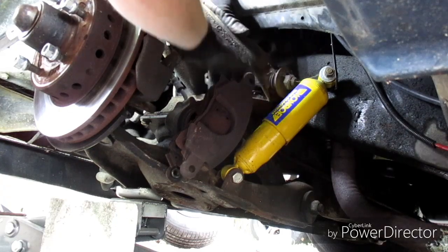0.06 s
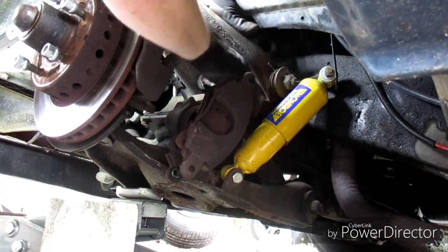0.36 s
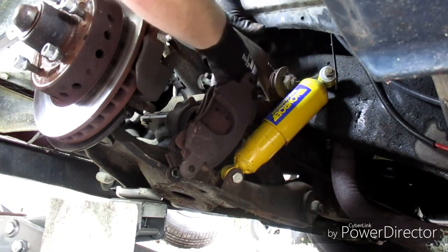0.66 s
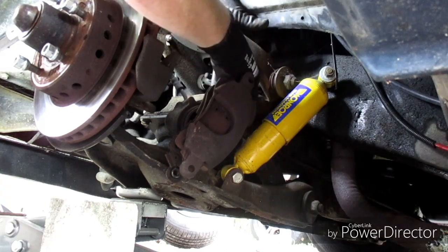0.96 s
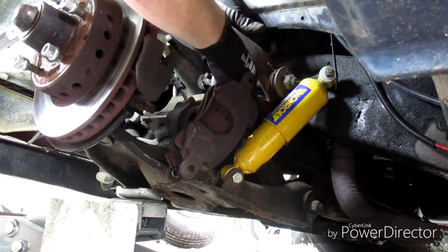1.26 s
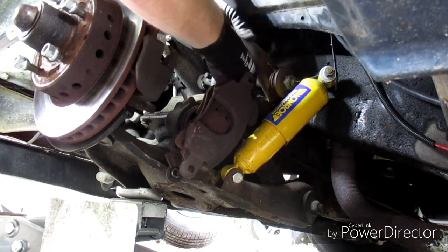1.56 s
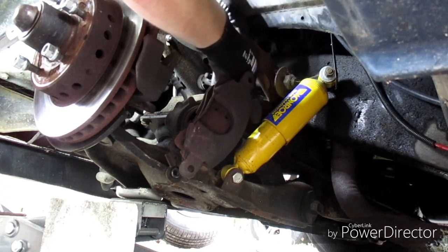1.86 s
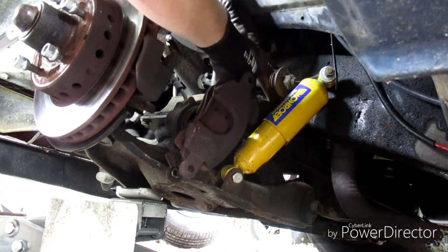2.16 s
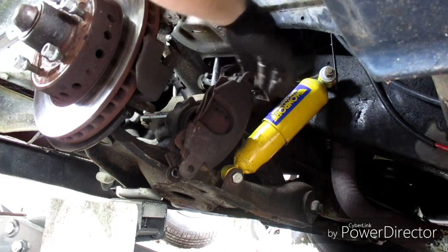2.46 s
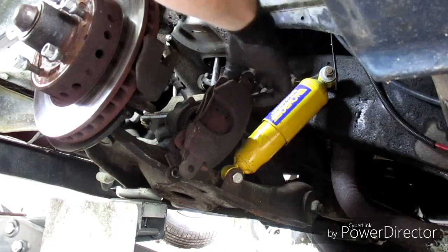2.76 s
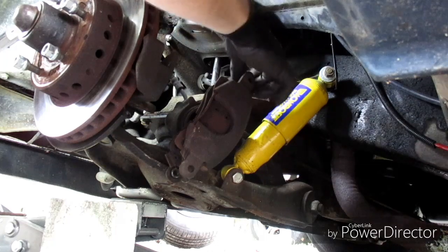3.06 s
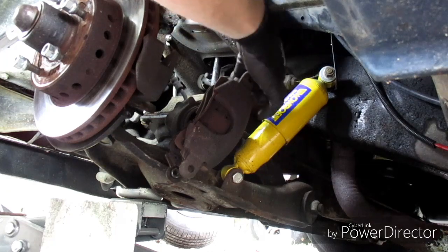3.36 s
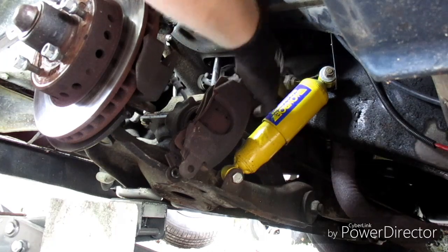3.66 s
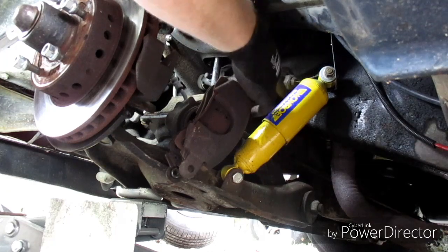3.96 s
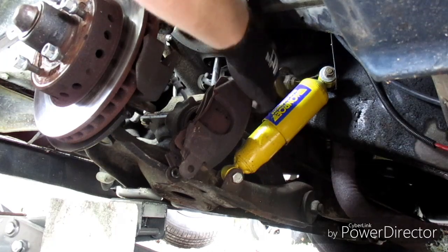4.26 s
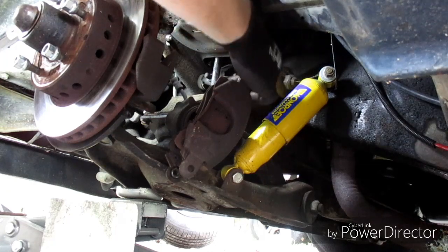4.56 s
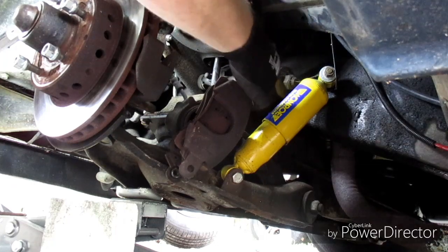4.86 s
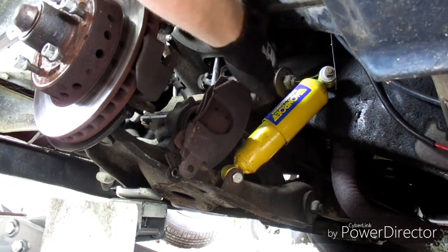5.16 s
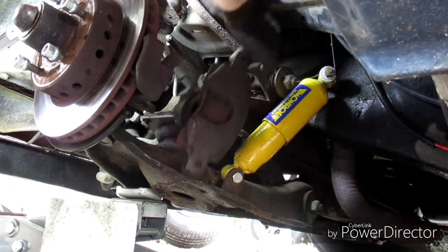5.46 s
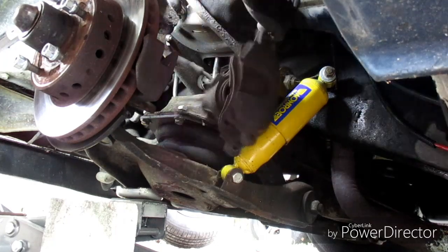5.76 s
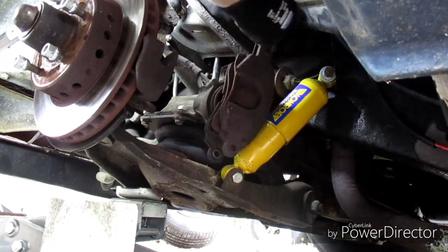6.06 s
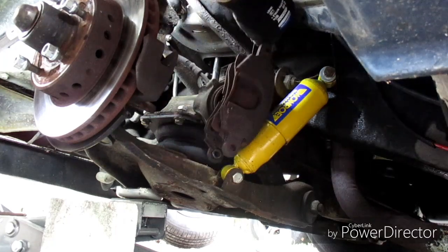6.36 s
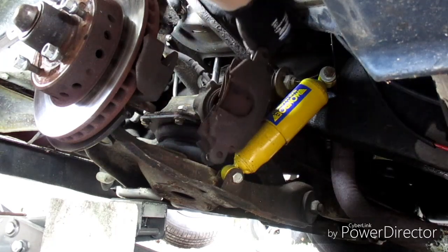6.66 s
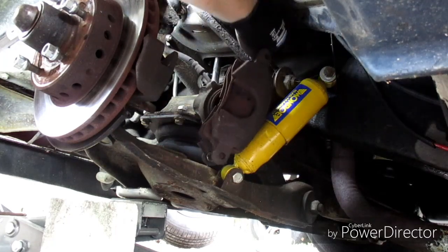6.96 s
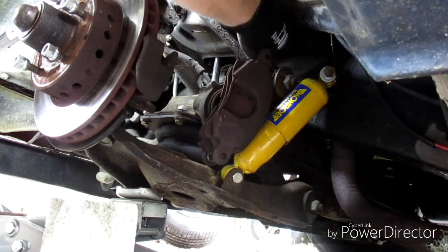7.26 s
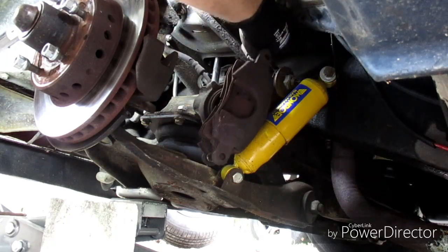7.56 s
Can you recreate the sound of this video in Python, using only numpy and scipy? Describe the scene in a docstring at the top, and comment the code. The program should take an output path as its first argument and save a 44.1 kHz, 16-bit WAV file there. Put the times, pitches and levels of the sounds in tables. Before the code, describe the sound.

A low engine hum from the street slowly falls in pitch and fades over a steady outdoor wash. Close by, under a truck in an open garage, small steel parts tick and scrape faintly, and a clip snaps once. The brake caliper then grinds loose with dull knocks, hits the suspension with one loud, sharp clank and rattles briefly to rest. A few light taps follow.

```python
"""Under a truck in an open garage, a gloved hand works a brake caliper loose. Small steel parts tick and snap,
soft hisses with narrow resonances swell and fade, and a brief gritty scrape sounds; then the heavy caliper
shifts, drops against the suspension with a clank and rattles to rest, each impact exciting damped modes.
Outside, the firing harmonics of a V8 fall and fade as it slows, over the wash of the street. Faint, high
whistles sound near the end."""
import sys
import numpy as np
from scipy import signal
from scipy.fft import rfft, irfft, next_fast_len
from scipy.io import wavfile
from scipy.ndimage import uniform_filter1d

SR = 44100
rng = np.random.default_rng(int(sys.argv[2]) if len(sys.argv) > 2 else 0)


def put_to_file(sound):
    """Save the sound as 16-bit audio at rate SR, in the file named by the first command-line argument."""
    columns = np.atleast_2d(sound).T  # one column per channel
    safe = np.clip(columns, -1, 1)
    whole_steps = np.round(safe * 32767)
    wavfile.write(sys.argv[1], SR, whole_steps.astype(np.int16))


N = 336171
TIME = np.arange(N) / SR

# Spectrum of steel striking steel. Each row: frequency in Hz, relative level in dB.
STEEL_SPECTRUM = [(200, -7), (800, 7), (1400, 23.5), (2050, 11.5), (3300, 7.5), (4200, 5.5), (5500, 1),
                  (7000, 1.5), (9700, -2), (11500, -11), (15500, -20)]


def amp(db):
    """Converts decibels to an amplitude ratio."""
    return 10 ** (np.asarray(db) / 20)


def unit_rms(x):
    """Normalises a signal to rms 1."""
    return x / np.sqrt(np.mean(x ** 2) + 1e-20)


def level_at(spectrum, hz):
    """Interpolates a spectrum's level in dB along a logarithmic frequency axis."""
    f, db = np.transpose(spectrum)
    return np.interp(np.log(hz + 1), np.log(f), db)


def curve(points):
    """Interpolates (seconds, value) points linearly to every sample."""
    return np.interp(TIME, *np.transpose(points))


def noise(spectrum, size=N):
    """White noise filtered to a given spectrum, at rms 1."""
    fast = next_fast_len(size)
    gain = amp(level_at(spectrum, np.fft.rfftfreq(fast, 1 / SR)))
    return unit_rms(irfft(rfft(rng.standard_normal(fast)) * gain, fast)[:size])


def drift(per_s):
    """A random fluctuation of rms 1 that takes per_s new values a second."""
    knots = rng.standard_normal(size=8000)
    return unit_rms(np.interp(TIME * per_s, np.arange(len(knots)), knots))


def add(mix, start_s, sound):
    """Superposes a sound on the mix."""
    part = mix[round(start_s * SR):][:len(sound)]
    part += sound[:len(part)]


def impacts(rows, modes, spectrum, focus_db, ring_focus_db, t60, rise_s,
            hard_db=np.inf, shorten=1, loose=False):
    """Modal response: each blow excites a noise-like clatter of dense modes and a few distinct ones."""
    out, t = np.zeros(N), np.arange(SR // 2) / SR
    hardening_span_db, choke_s = 15, .003
    mode_hz, mode_db, mode_t60 = np.transpose(modes)[:, :, None]
    next_contact = [row[0] for row in rows[1:]] + [np.inf]
    for (start_s, strength_db, hz, ring_db), next_s in zip(rows, next_contact):
        # a blow as strong as hard_db rebounds cleanly: it is briefer and excites every mode
        hard = np.clip(1 + (strength_db - hard_db) / hardening_span_db, 0, 1)
        time_scale = shorten ** hard
        # the contact colours the clatter: focus_db is the loss one octave from its pitch
        tinted = [(f, db - focus_db * np.log2(f / hz) ** 2) for f, db in spectrum]
        clatter = noise(tinted, size=len(t)) * amp(-60 * t / (t60 * time_scale))
        # a lighter blow favours the modes near its pitch
        off_pitch_db = ring_focus_db * (1 - hard) * np.log2(mode_hz / hz) ** 2
        start_db = ring_db + mode_db - off_pitch_db - 5.5 * hard  # a clean strike rings less
        start_db += 0.26 * rng.standard_normal(mode_hz.shape)
        ring = amp(start_db - 60 * t / mode_t60) * np.sin(2 * np.pi * mode_hz * t)
        if loose:  # the part chatters on its seat; after a rebound, the next contact damps it
            ring *= amp(1.25 * (1 - hard) * drift(per_s=280)[:len(t)])
            ring *= np.exp(-hard * np.maximum(t - (next_s - start_s), 0) / choke_s)
        attack = np.minimum(t / (rise_s * time_scale), 1)
        add(out, start_s, amp(strength_db) * (clatter + ring.sum(0)) * attack)
    return out


def caliper():
    """Impact excitation: the caliper's modes ring as it grinds loose, strikes steel and bounces."""
    # Each row: mode frequency in Hz, level in dB, 60 dB decay time in seconds.
    modes = [(1240, -13, .03), (1548, -11, .075), (1669, -16, .07), (2240, -12, .04), (2643, 0, .078),
             (2912, -25, .15), (3170, -27, .05), (4072, -22, .075), (4270, -23, .065), (4800, -6, .012),
             (4992, -2, .027), (5650, -10, .028), (6250, 2, .011), (6720, 0, .013), (7320, -3, .023),
             (7850, -8, .015), (8489, -19, .04), (9787, -9, .025)]
    # Steel-on-steel contacts. Each row: start in seconds, strength in dB, pitch in Hz, ring gain in dB.
    grinds = [(5.496, -28, 1720, 24)]
    clanks = [(5.449, -32.5, 1548, 8), (5.4645, -39, 1630, 16), (5.502, -29.5, 4120, 25.5),
              (5.516, -35, 4000, 14), (5.541, -31, 4140, 14), (5.569, -36, 5560, 5), (5.576, -39, 3200, 29),
              (5.7815, -20.5, 5600, 18), (5.795, -24.5, 4080, 22), (5.8122, 1.5, 6340, 3),
              (5.848, -21.5, 4040, 20), (5.852, -27.5, 2990, 23), (5.888, -35, 4100, 10),
              (5.899, -24, 4100, 9), (5.9455, -37, 6720, 2), (5.9895, -34, 1800, -8),
              (6.0355, -39, 2300, -2.5), (6.072, -37, 3380, -7.5), (6.477, -37, 4300, -2),
              (6.495, -31.5, 4100, 9), (6.497, -37, 2680, -2)]
    grind = impacts(grinds, modes, STEEL_SPECTRUM, focus_db=0.5, ring_focus_db=500,
                    t60=0.15, rise_s=0.0057)
    rattle = impacts(clanks, modes, STEEL_SPECTRUM, focus_db=1.8, ring_focus_db=1100,
                     t60=0.067, rise_s=0.0016, hard_db=0, shorten=0.27, loose=True)
    return grind + rattle


def suspension():
    """Damped vibration: the heavy arm's low modes answer the caliper's slow drag and dull knocks."""
    # Each row: mode frequency in Hz, level in dB, 60 dB decay time in seconds.
    modes = [(92, -7, 0.3), (140, -0.5, 0.16), (218.6, 3.5, 0.1), (244.6, -7, 0.28), (317, -12.5, 0.43),
             (357, -17, 0.6), (393, -10, 0.33), (429, -30, .12), (604, -2.5, 0.097), (767, -8, 0.17),
             (880, -9, 0.057), (1100, -8, 0.22)]
    # Spectrum of a dull blow. Each row: frequency in Hz, relative level in dB.
    thud = [(30, -7), (70, 17.5), (200, 5.5), (420, 2), (600, -8), (950, -7), (1300, -16.5), (2500, -23.5),
            (6000, -29), (12000, -46)]
    # Each row: start in seconds, strength in dB, pitch in Hz, ring gain in dB.
    drags = [(5.385, -22, 557, -24)]
    knocks = [(5.4965, -17.5, 388, 0), (5.506, -25, 330, -4), (5.519, -15, 150, 1),
              (5.531, -20.5, 378, -12), (5.569, -29.5, 338, 7.5), (5.7815, -6, 520, -1.5),
              (5.803, -13, 220, 12.5), (5.898, -8, 447, 5.5), (5.903, -19.5, 860, -5),
              (6.478, -43, 200, 13), (6.495, -29.5, 950, -18)]
    drag = impacts(drags, modes, thud, focus_db=2, ring_focus_db=0, t60=.7, rise_s=.05)
    return drag + impacts(knocks, modes, thud, focus_db=2, ring_focus_db=15.5, t60=0.24, rise_s=0.0032)


def small_parts():
    """Brief contacts excite high modes: a tap on the bracket, ticks and one snap of the spring clip."""
    # Each row: mode frequency in Hz, level in dB, 60 dB decay time in seconds.
    bracket_modes = [(1620, 2, 0.041), (1760, -6, 0.049), (2700, -8, 0.056), (5642, -13, .05),
                     (7289, -17, .04)]
    clip_modes = [(1400, -6, .025), (2450, -4, .03), (2860, -6, .045), (3300, -7, .03), (3811, -7, .05),
                  (4250, -5, .025), (4985, 3, .035), (5640, -5, .04), (6700, -5, .03), (7305, -10, .07),
                  (7800, -3, .03), (8400, -7, .06), (8880, -3, .045), (9825, -8, .06), (10870, -6, .05)]
    # Each row: frequency in Hz, relative level in dB.
    tick_spectrum = [(300, -22), (1000, -10), (1700, 0), (3000, 2), (5500, 1), (9000, 3.5), (12000, -6),
                     (15500, -12)]
    # Each row: start in seconds, strength in dB, pitch in Hz, ring gain in dB.
    taps = [(3.2995, -31.5, 2000, 2.2)]
    ticks = [(.2618, -40, 5840, 7), (.3237, -43, 8600, 1), (.501, -47, 7900, 1), (.9802, -48, 9000, -7),
             (2.8654, -43.5, 7000, -6), (2.973, -44.5, 8000, 2), (3.0739, -42.5, 8500, -1),
             (3.1877, -48, 9000, -10), (3.4239, -17, 6900, -1.5), (3.5443, -39, 6060, 8.5),
             (3.555, -40, 6900, -7), (4.133, -50.5, 5000, 1), (4.7112, -47, 9000, -4),
             (5.192, -50, 4500, 8)]
    bracket = impacts(taps, bracket_modes, STEEL_SPECTRUM, focus_db=1, ring_focus_db=0.5,
                      t60=0.045, rise_s=0.00082)
    clip = impacts(ticks, clip_modes, tick_spectrum, focus_db=-1, ring_focus_db=254,
                   t60=0.047, rise_s=.001, hard_db=-19, shorten=0.73)
    return bracket + clip


def resonant_strokes(slips_per_s=1400, grit_db=-3, judder_db=1.5):
    """Sparse, uneven clicks drive narrow resonances over grit: soft hisses swell and fade, a gritty scrape
    leads into the clank, and a thin ring follows."""
    # Each row: start, rise, hold and fall in seconds, level in dB, squeak tilt in dB per octave,
    # squeak gain in dB.
    strokes = [(2.88, 0.18, 0.53, 0.17, -53, -2.5, -0.5), (4.05, .12, .37, .1, -55.5, -7, -1.5),
               (4.81, 0.013, 0.073, .2, -51.5, -10, -0.5), (5.39, 0.046, .04, .03, -43.5, -3, -13),
               (5.582, 0.09, 0.072, .04, -50.5, -3, -4), (6.064, .005, 0.04, .2, -59, -28, 6)]
    # Each row: centre frequency in Hz, bandwidth in Hz, level in dB.
    resonances = [(2430, 70, -0.5), (3240, 100, -4), (4780, 140, -8), (7150, 120, -10)]
    # Each row: frequency in Hz, relative level in dB.
    grit_spectrum = [(1000, -24), (2400, 2), (5000, -5), (9000, -17), (15500, -30)]
    out = np.zeros(N)
    slips = rng.standard_normal(N) * (rng.random(N) < slips_per_s / SR)
    rings = [unit_rms(signal.lfilter(*signal.iirpeak(hz, hz / width, SR), slips))
             for hz, width, _ in resonances]
    grit = amp(grit_db) * noise(grit_spectrum)
    judder = amp(judder_db * drift(per_s=60))
    for start_s, rise, hold, fall, db, tilt, squeak_db in strokes:
        pressure = np.interp(TIME, start_s + np.cumsum([0, rise, hold, fall]), [0, 1, 1, 0])
        squeak = sum(ring * amp(ring_db + tilt * np.log2(hz / resonances[0][0]))
                     for ring, (hz, _, ring_db) in zip(rings, resonances))
        out += amp(db) * pressure * judder * (amp(squeak_db) * squeak + grit)
    return out


def underbody(x, wet_db=-21, t60=.13):
    """Early reflections between the floor and the wheel well follow the direct sound and die quickly."""
    t = np.arange(SR // 3) / SR
    echoes = rng.standard_normal(len(t)) * (rng.random(len(t)) < 2000 / SR)
    response = echoes * (t > .003) * amp(-60 * t / t60)
    return x + amp(wet_db) * signal.fftconvolve(x, response / np.linalg.norm(response))[:N]


def engine(cruise_hz=19, waver_db=1.6, jitter_rad=0.12, throb_depth=0.098):
    """Periodic excitation: uneven firings give harmonics of the cycle rate, over rumble and roar."""
    # Each row: time in seconds, four-stroke cycles per second.
    speed_points = [(0, 25.4), (.14, 25.1), (.24, 23.8), (.35, 21.1), (.47, 18.9), (.88, 18.95), (1, 19.2),
                    (1.39, 19.6), (1.6, 19.25), (2.5, 18.65), (3, 17.6), (3.25, 16.1), (3.5, 15),
                    (3.95, 13.4), (5, 12.6), (6, 11), (7.1, 9.1)]
    # Each row: time in seconds, throttle from 0 (coasting) to 1 (pulling).
    throttle_points = [(0, 0.71), (1, 1), (2.2, 0), (3.1, 0), (3.9, 1), (7.62, 1)]
    # Each row: time in seconds, gain of the exhaust hum in dB.
    hum_points = [(0, -18.5), (.13, -16.5), (.23, -16), (.38, -22), (.8, -21.5), (1.1, -22.5),
                  (1.27, -24.5), (1.42, -22.5), (1.62, -24.5), (1.96, -24.5), (2.08, -25.5), (2.5, -25),
                  (2.95, -26), (3.5, -34), (4.3, -31), (4.65, -33.5), (5, -31), (6.2, -29.5), (6.8, -39),
                  (7.62, -38)]
    # Exhaust harmonics. Each row: multiple of the cycle rate, relative dB pulling, relative dB coasting.
    orders = [(3, -10, -7.5), (4, -31, -21), (5, -2, -3), (6, -6.5, -5.5), (7, -22, -10), (8, 0.5, -1),
              (9, -8, -6.5), (10, -13.5, -13.5), (11, -9.5, -2), (12, -17, -8), (13, -7.5, -13),
              (14, -11, -17), (15, -11, -12), (16, -12, -9.5), (17, -15.5, -13), (18, -13, -10)]
    # Each row: frequency in Hz, relative level in dB.
    exhaust_response = [(25, -12), (50, -1.5), (72, 2.5), (100, 1.5), (122, 3), (138, -2.5), (155, 1.5),
                        (185, -2.5), (225, -4), (247, 3), (275, -9.5), (300, -11), (327, -1), (360, -8.5),
                        (500, -10.5)]
    rumble_spectrum = [(20, -24), (35, -10), (60, -9), (110, 0), (180, 0.5), (260, -6.5), (400, -12.5),
                       (700, -19.5), (2000, -77)]
    roar_spectrum = [(150, -28), (300, -6), (400, -9.5), (560, -9), (680, -10), (860, -6), (1300, -15),
                     (2400, -20), (3700, -28.5), (6400, -35.5), (11000, -46), (15500, -62)]
    cycle_hz, throttle = curve(speed_points), curve(throttle_points)
    cycle_phase = 2 * np.pi * np.cumsum(cycle_hz) / SR
    harmonics = np.zeros(N)
    for order, pull_db, coast_db in orders:
        db = coast_db + throttle * (pull_db - coast_db) + level_at(exhaust_response, order * cycle_hz)
        # each order wavers on its own as the echoes off the street shift
        db += waver_db * drift(per_s=9.2)
        phase = order * cycle_phase + jitter_rad * drift(per_s=8) + 2 * np.pi * rng.random()
        harmonics += amp(db) * np.cos(phase)
    hum = amp(-0.44) * unit_rms(harmonics) + amp(-9.5) * noise(rumble_spectrum)
    throb = 1 + throb_depth * np.cos(8 * cycle_phase)  # eight firings make one cycle
    roar = noise(roar_spectrum) * throb * amp(0.13 * drift(per_s=30))
    roar_db = -38.5 + 9 * np.log2(cycle_hz / cruise_hz)  # 9 dB for each doubling of speed
    roar_db += 2 * np.exp(-((TIME - 1.54) / 0.42) ** 2)  # one swell while cruising
    return amp(curve(hum_points)) * hum + amp(roar_db) * roar


def street(level_db=-38, swell_db=.4):
    """Broadband ambient noise: a nearly steady wash comes in through the open door."""
    # Each row: frequency in Hz, relative level in dB.
    spectrum = [(20, -32), (35, -3.5), (70, -1.5), (110, -4), (190, -5.5), (280, -12), (420, -18),
                (650, -16.5), (900, -16.5), (1400, -27.5), (2400, -32.5), (4500, -37), (8400, -41.5),
                (15500, -54)]
    return amp(level_db + swell_db * drift(per_s=2.75)) * noise(spectrum)


def whistles(waver_hz=70, flutter_db=1.8, rise_db_per_s=1.5):
    """Random modulation of pitch and level roughens thin, far tones, each growing until it stops."""
    # Each row: start in seconds, duration in seconds, frequency in Hz, base level in dB.
    tones = [(5.624, 1.35, 7430, -64), (6.398, 0.72, 9570, -73), (7.08, 0.2, 8400, -67)]
    out = np.zeros(N)
    for start_s, length_s, hz, db in tones:
        level_db = db + rise_db_per_s * (TIME - length_s / 2) + flutter_db * drift(per_s=40)
        phase = 2 * np.pi * np.cumsum(hz + waver_hz * drift(per_s=400)) / SR
        tone = amp(level_db) * np.sin(phase)
        fade = signal.windows.tukey(round(length_s * SR), .12)
        add(out, start_s, fade * tone[:len(fade)])
    return out


def scene():
    """Superposition in one channel: near metal under the truck, with the engine and street behind it."""
    metal = suspension() + caliper() + small_parts() + resonant_strokes()
    return (underbody(metal) + engine() + street() + whistles())[None]


def record(dry, threshold_db=-6, recovery_db_per_s=9, ceiling=.92, cutoff_hz=15700):
    """Automatic gain control ducks at the big clank and creeps back; clipping and a low-pass follow."""
    power_db = 10 * np.log10(abs(uniform_filter1d(dry[0] ** 2, size=130)) + 1e-12)
    recovery_db = TIME * recovery_db_per_s
    held_peak_db = np.maximum.accumulate(power_db + recovery_db) - recovery_db
    reduction_db = uniform_filter1d(np.maximum(held_peak_db - threshold_db, 0), size=60)
    clipped = np.clip(dry / amp(reduction_db), -ceiling, ceiling)
    lowpass = signal.firwin(255, cutoff_hz, window=("kaiser", 9), fs=SR)
    return signal.oaconvolve(clipped, lowpass[None], "same")


dry = scene()
out = record(dry)
put_to_file(out)
```